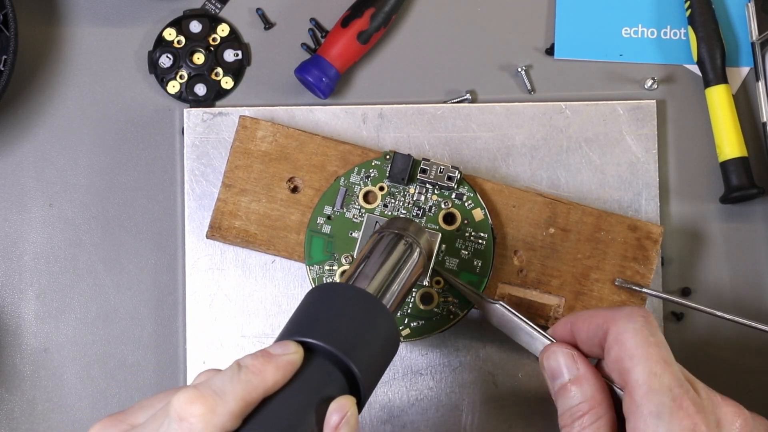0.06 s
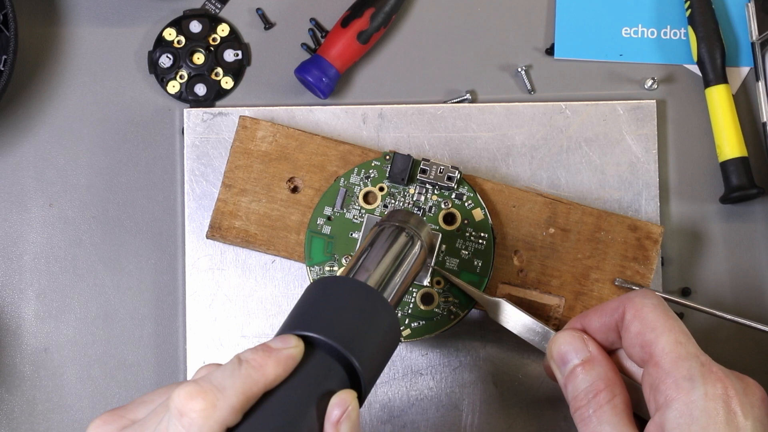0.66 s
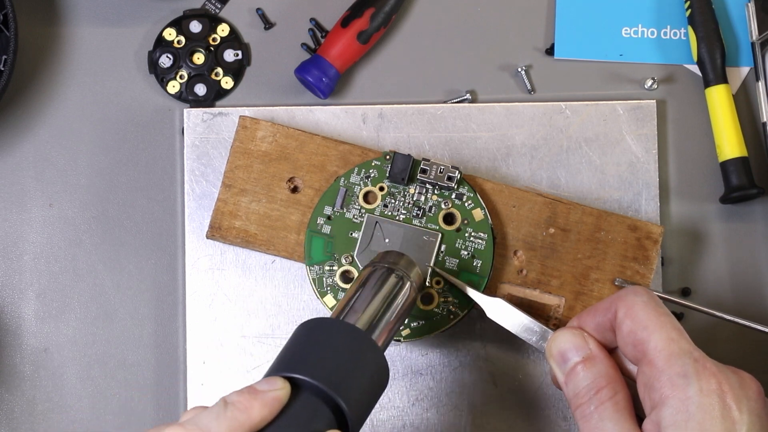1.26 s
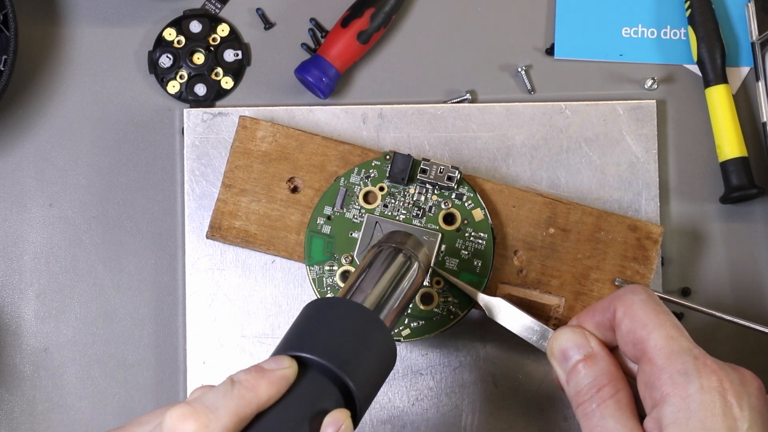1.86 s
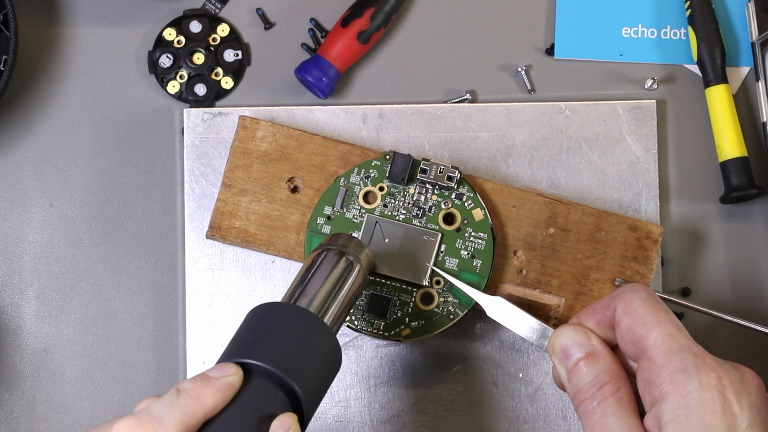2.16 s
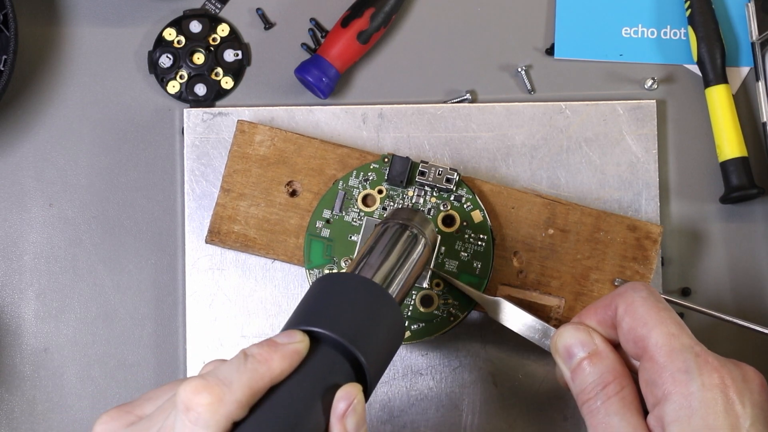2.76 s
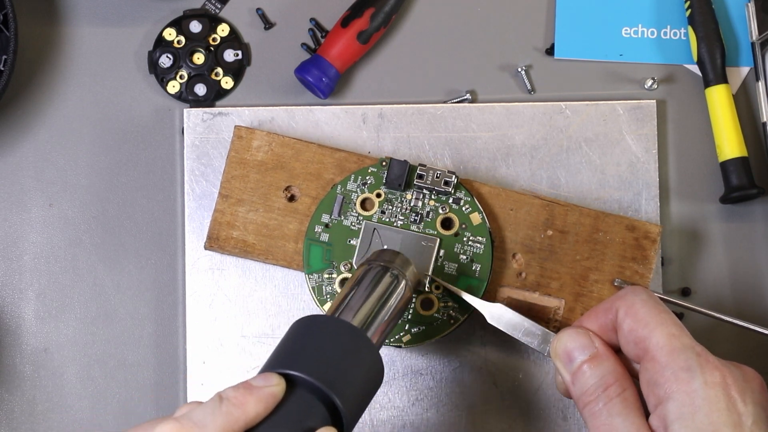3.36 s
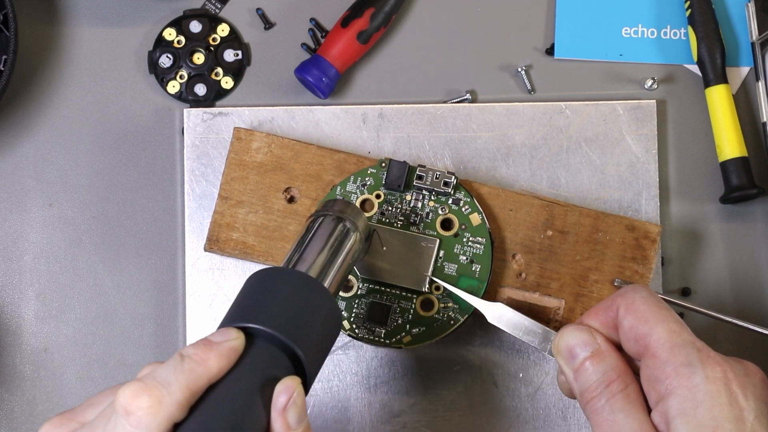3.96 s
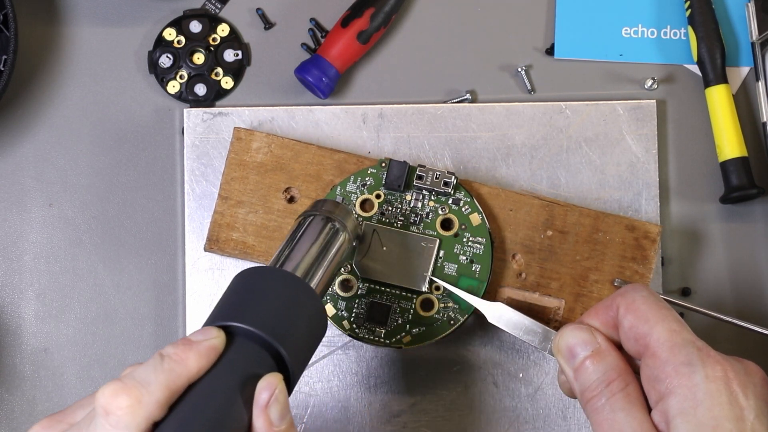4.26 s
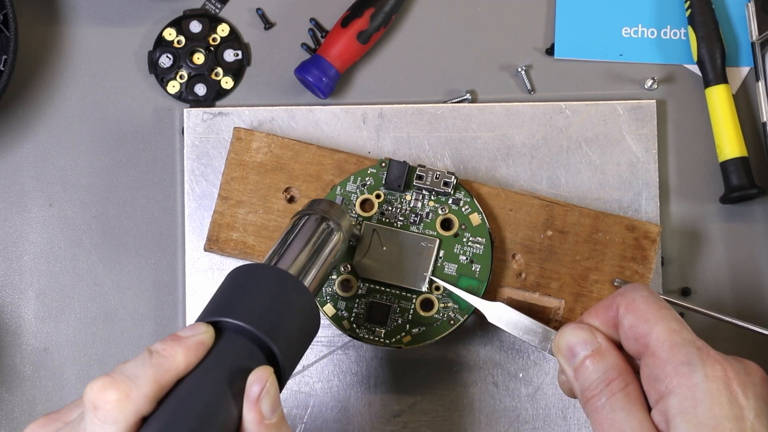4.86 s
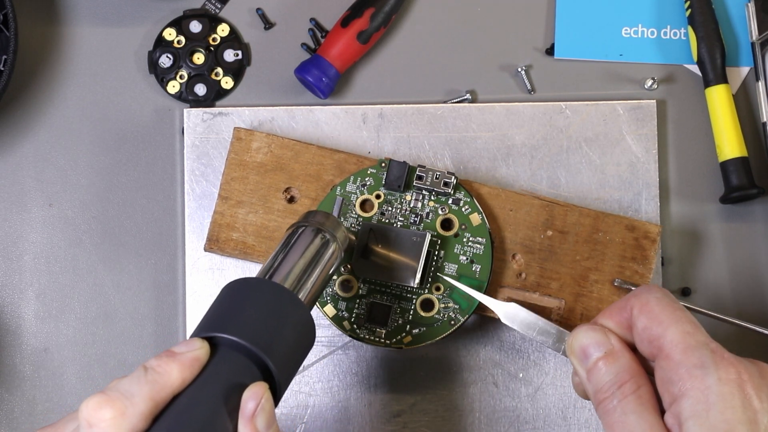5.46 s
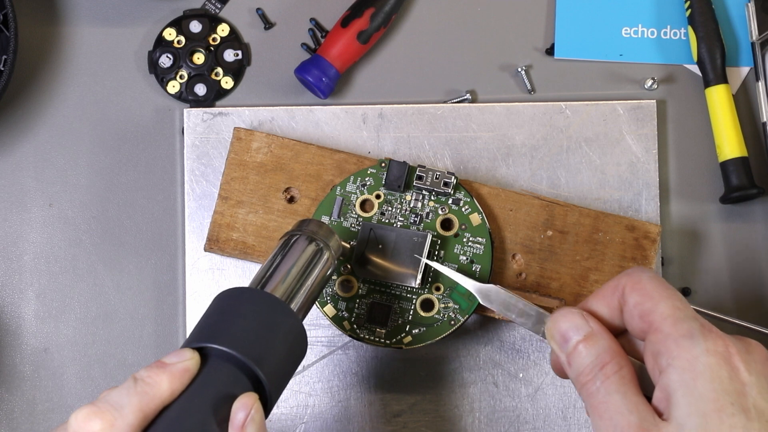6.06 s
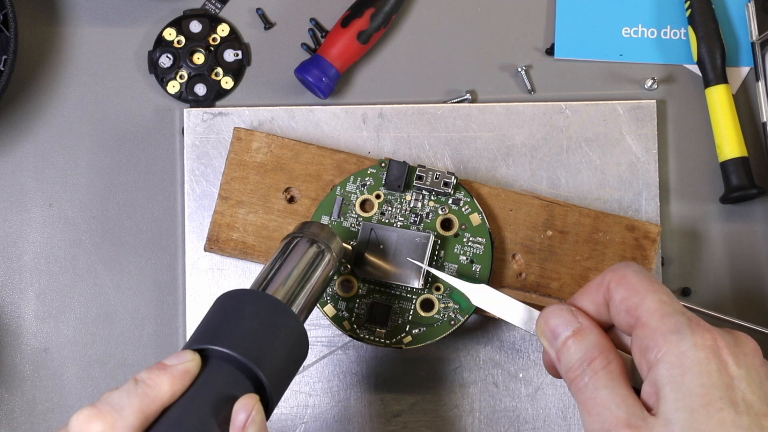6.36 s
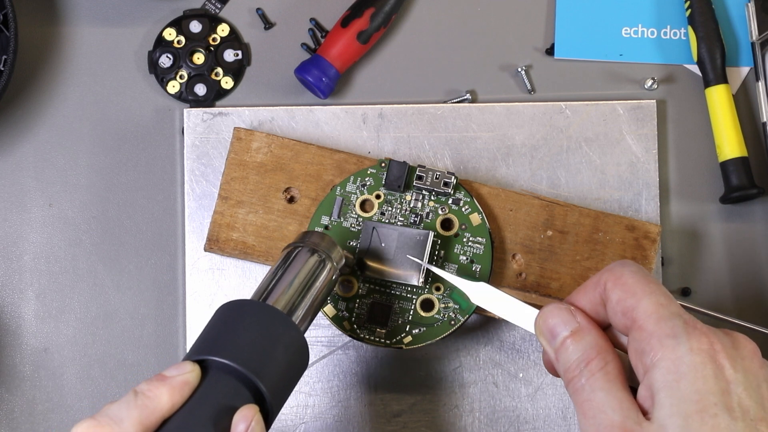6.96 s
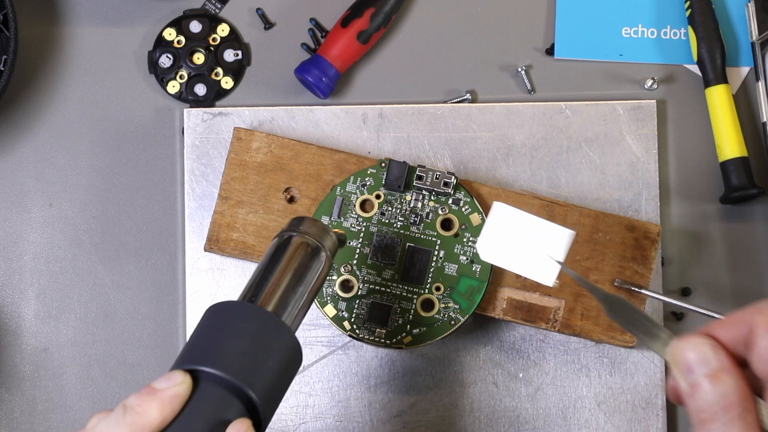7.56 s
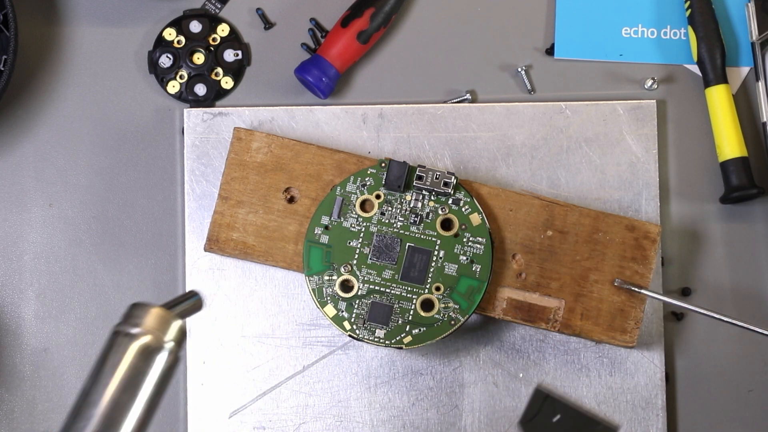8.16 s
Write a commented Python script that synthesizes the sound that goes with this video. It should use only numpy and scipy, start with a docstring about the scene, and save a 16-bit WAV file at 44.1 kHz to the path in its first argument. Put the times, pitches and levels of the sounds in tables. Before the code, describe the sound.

Close to the microphone in a dry workshop, a hot air gun hisses continuously over a circuit board, its blower rumbling underneath. Short roars come as the air crosses a metal shield's edge. Midway the level steps up and a faint hum shows, while the hiss occasionally thins for an instant. Hands softly nudge the bench, the air flutters more strongly, then the hiss sweeps and whistles thinly as the gun swings away.

```python
"""A hot air gun, close to one microphone, swept over a circuit board on a bench in a dry workshop. The nozzle
hisses over the blower's rumble, and the jet roars where it catches a metal shield's edge. The bench reflects
the sound, so the hiss turns hollow and sweeps as the gun lifts away at the end, with airy whistles from the
nozzle's lip. Hands bump the bench softly. The level steps up near 4 s, and now and then the hiss thins out for
an instant."""
import sys
import numpy as np
from scipy import signal
from scipy.fft import rfft, irfft, next_fast_len
from scipy.io import wavfile
from scipy.ndimage import uniform_filter1d, map_coordinates

SR = 44100
rng = np.random.default_rng(int(sys.argv[2]) if len(sys.argv) > 2 else 0)


def waveform_to_disk(signal):
    """Save audio, clipped to [-1, 1], as 16-bit WAV at the path in sys.argv[1]."""
    frames = np.transpose(np.atleast_2d(signal))
    scaled = np.clip(frames, -1, 1) * 32767
    samples = np.round(scaled).astype(np.int16)
    wavfile.write(sys.argv[1], SR, samples)


N = 362492

# the gun's distance from the bench: (time [s], height [multiple of working height])
GUN_HEIGHT = [(0, 0.98), (3.9, 1.025), (7.0, 0.99), (7.8, 0.95), (8.0, 1.35), (8.22, 1.2)]


def jet(sway_db=0.42, sway_per_s=6):
    """Large eddies wash over the board, small ones hiss at the nozzle; an unsteady hand sways the level."""
    # the nozzle tilts: (time [s], half length [s], hiss change [dB], wash and spray change [dB])
    tilts = [(5.25, 0.25, 1, 0), (5.896, .08, -2, 0), (6.553, 0.58, 1.4, 1.5), (7.2, 0.16, -6, -1),
             (7.53, .03, -1.5, -0.5)]
    free, step = in_open_air(), level_step()
    top_db = sum(db * swell(s, half, half) for s, half, db, _ in tilts) + sway_db * wobble(sway_per_s)
    body_db = sum(db * swell(s, half, half) for s, half, _, db in tilts) + sway_db * wobble(sway_per_s)
    wash = jet_band(lambda hz: above(hz, 1550) * below(hz, 5160), free, eddy_db=2.5)
    spray = jet_band(lambda hz: above(hz, 4800) * below(hz, 7430, order=16), free, eddy_db=3.5)
    hiss = jet_band(lambda hz: above(hz, 7400, order=16), free, eddy_db=4.3)
    wash *= amp(-45.5 + 3.5 * step - 3 * free + body_db)
    spray *= amp(-43.5 + 3.5 * step - 1.5 * free + body_db)
    hiss *= amp(-38 + 4 * step - 3.5 * free + top_db + 0.27 * wobble(25))
    return wash + spray + hiss


def jet_band(band, free, eddy_db):
    """One band of the jet: nearly steady on the board, swirling once it blows into open air."""
    # colour of the jet in open air: (frequency [Hz], relative level [dB])
    open_colour = [(1400, -17), (2000, -11.5), (2600, -12.5), (3200, -13.5), (5200, -15), (7000, -13.5),
                   (8000, -3), (9200, -1.5), (10200, -2.5), (11300, -9.5), (13500, -13), (15700, -17)]
    on_board = swirl(noise(lambda hz: through_gun(hz) * band(hz)), depth_db=1.16)
    in_air = swirl(noise(lambda hz: amp(along(open_colour, hz)) * band(hz)), depth_db=eddy_db)
    return np.sqrt(1 - free) * on_board + np.sqrt(free) * in_air


def through_gun(hz):
    """The air stream's colour, shaped by each resonance of the gun."""
    # broad colour of the air stream: (frequency [Hz], relative level [dB])
    air_colour = [(25.0, -33), (55.0, -17), (110.0, -15.5), (300.0, -11.5), (450.0, -15), (1100.0, -8.0),
                  (2000.0, -4.5), (3000.0, -2), (5000.0, -3), (7300.0, 0.0), (10500.0, 0.5), (14300.0, -6),
                  (15500.0, -9.5)]
    # resonances and antiresonances of housing, barrel and nozzle: (centre [Hz], width [Hz], gain [dB])
    resonances = [(146, 62, 16.0), (238, 36, 5.5), (333, 48, 3.9), (574, 106, 11.6), (704, 107, 5.6),
                  (921, 99, 4.7), (1392, 37, 3.9), (1500, 60, -3), (1596, 88, 6.6), (1955, 165, 4.9),
                  (2259, 109, 3.2), (2410, 213, 8.3), (2694, 113, 3.0), (2990, 170, -4), (3251, 206, 5.6),
                  (3466, 53, 3.7), (4020, 236, 5.7), (4362, 206, 7.2), (4830, 330, -2), (5012, 70, 4.8),
                  (5544, 236, 6.2), (5863, 158, 5.3), (6535, 350, 6.0), (6968, 152, 5.1), (7322, 43, 3.7),
                  (7642, 97, 4.2), (8163, 769, 9.5), (8925, 832, 11.2), (9954, 306, 3.7), (11360, 449, 2.4)]
    peaks_db = sum(db / (1 + (2 * (hz - centre) / width) ** 2) for centre, width, db in resonances)
    return amp(along(air_colour, hz) + peaks_db)


def swirl(x, depth_db):
    """Wandering eddies brighten and dull patches of the hiss, which glide down as the gun rises."""
    _, t, spectrum = signal.stft(x, SR, nperseg=1024)
    eddies = uniform_filter1d(rng.standard_normal(spectrum.shape), size=5, axis=0)
    eddies = uniform_filter1d(eddies, size=15, axis=1)
    glide = np.interp(t, *np.transpose(GUN_HEIGHT)) ** 0.21
    row, frame = np.indices(spectrum.shape)
    eddies = map_coordinates(eddies, [row * glide, frame], order=1, mode="mirror")
    swirled = signal.istft(spectrum * amp(depth_db * eddies / np.std(eddies)), nperseg=1024)[1][:N]
    return swirled / np.std(swirled)


def in_open_air(start_s=7.03, slide_s=0.65):
    """Share of the jet that has slid off the board, 0-1."""
    return np.clip((np.arange(N) / SR - start_s) / slide_s, 0, 1)


def level_step(at_s=3.968):
    """0 before the sound gets louder, 1 after."""
    return np.clip((np.arange(N) / SR - at_s) / .002, 0, 1)


def thinning(x, keep_hz=8500, width_hz=2700):
    """For an instant the broad rush drops away; the nozzle's peak and a few strong partials remain."""
    # instants when the hiss thins out: (time [s], length [s])
    dips = [(.868, .014), (4.11, .017), (4.238, .017), (4.41, .018), (4.688, .019), (4.751, .016),
            (4.965, .017), (5.05, .015), (5.306, .016), (5.498, .016), (5.605, .016), (5.765, .037),
            (5.862, .017), (6.137, .016), (6.202, .016), (6.991, .015), (7.46, .02), (7.61, .017),
            (7.737, .017)]
    t = np.arange(N) / SR
    gap = np.clip(sum(below(abs(t - s), length / 2, order=3) for s, length in dips), 0, 1)
    hz, _, spectrum = signal.stft(x, SR, nperseg=1024)
    power = abs(spectrum) ** 2
    strong = power > 3.3 * uniform_filter1d(power, size=40, axis=0)
    partials = np.maximum(1.4 * strong, amp(-16))
    nozzle_peak = below(abs(hz - keep_hz), width_hz / 2, order=4)[:, None]
    thin = signal.istft(spectrum * np.maximum(partials, nozzle_peak), SR, nperseg=1024)[1][:N]
    return x * (1 - gap) + thin * gap


def edge_roar(colour_share=0.28):
    """The jet splits on the shield's edge: it flutters in the barrel, and rasps when it passes close."""
    # the jet meets an edge, longest while the shield is prised up:
    # (time [s], rise [s], fall [s], flutter level [dB], rasp level [dB])
    crossings = [(1.175, 0.034, 0.027, -43.5, -48), (1.295, 0.042, 0.03, -44, -40.5),
                 (1.455, 0.043, 0.032, -47.5, -48), (1.985, .05, .035, -46.5, -37.5),
                 (2.23, 0.059, 0.095, -40.5, -46), (3.46, .14, .07, -54, -46.5),
                 (4.4, 0.37, 0.46, -50, -60), (6.48, 0.13, 0.18, -38.5, -60), (6.75, 0.18, 0.23, -36, -42)]
    # colours of the flutter and the rasp: (frequency [Hz], relative level [dB])
    flutter_colour = [(700, -42), (1400, -20), (1750, -11), (1970, -4), (2120, -6), (2380, 0), (2720, -3.5),
                      (3050, -13), (4200, -17), (6000, -30), (9000, -42)]
    rasp_colour = [(1200, -35), (2000, -4), (2450, -0.5), (3000, 2), (3700, -2), (4300, 3), (5100, -1),
                   (6500, -10), (10000, -35)]
    flutter_gain = sum(amp(db) * swell(s, rise, fall) for s, rise, fall, db, _ in crossings)
    rasp_gain = sum(amp(db) * swell(s, rise, fall) for s, rise, fall, _, db in crossings)
    voiced = lambda colour: noise(lambda hz: amp(along(colour, hz)) * through_gun(hz) ** colour_share)
    flutter = voiced(flutter_colour) * flutter_gain * amp(.4 * wobble(35))
    return flutter + voiced(rasp_colour) * rasp_gain


def lip_whistle(half_width_hz=230, skirt_hz=1200):
    """Vortices leave the lip almost regularly: gliding puffs of narrow hiss in a swirling skirt."""
    # puffs as the gun swings away: (time [s], half length [s], pitch [Hz], level [dB])
    puffs = [(7.427, .06, 8620, -36.5), (7.602, 0.044, 8600, -37), (7.752, 0.073, 8800, -36),
             (7.86, .04, 9550, -39), (7.997, 0.052, 8850, -42), (8.149, .08, 9050, -42)]
    pitch_hz = curves(puffs)[1]
    strength = sum(amp(db) * swell(s, half, half) for s, half, _, db in puffs)
    carrier = np.sqrt(2) * np.sin(2 * np.pi * np.cumsum(pitch_hz) / SR)
    core = carrier * noise(lambda hz: below(hz, half_width_hz, order=2))
    skirt = swirl(carrier * noise(lambda hz: below(hz, skirt_hz, order=4)), depth_db=5)
    return (amp(-3) * core + amp(-1) * skirt) * strength


def blower():
    """Fan noise booms in housing and barrel; the rotor's hum stands out in the louder part."""
    step = level_step()
    rumble = noise(lambda hz: through_gun(hz) * below(hz, 480))
    rumble *= amp(-60 + 4 * step + 0.69 * wobble(4.5))
    barrel = noise(lambda hz: through_gun(hz) * above(hz, 392) * below(hz, 1500))
    barrel *= amp(-55 + 5.46 * step - 5.5 * in_open_air() ** 2 + 0.93 * wobble(7))
    rotor_hz = 236.9 + .3 * wobble(3)
    hum = np.sin(2 * np.pi * np.cumsum(rotor_hz) / SR) * amp(-66.5 + 6.5 * step)
    return rumble + barrel + hum


def bumps(half_s=0.07):
    """The hands nudge board and bench: dull, brief swells."""
    # soft handling bumps: (time [s], pitch [Hz], level [dB])
    nudges = [(.57, 115, -58.5), (5.96, 72, -66), (6.09, 283, -60), (6.18, 198, -55.5)]
    thud = lambda pitch: noise(lambda hz: above(hz, pitch * 0.97) * below(hz, pitch))
    return sum(amp(db) * swell(s, half_s, half_s, squareness=2) * thud(pitch) for s, pitch, db in nudges)


def bench(x):
    """Reflections comb the sound; they reach the microphone later as the gun rises."""
    # reflections off board and bench: (delay at working height [s], gain [linear])
    reflections = [(.0005, .16), (.001174, .07), (.0015, .075), (.0029, .06), (.00585, .06)]
    height, = curves(GUN_HEIGHT)
    return x + sum(gain * map_coordinates(x, [np.arange(N) - delay * height * SR])
                   for delay, gain in reflections)


def room(x, wet_db=-13, t60=.1):
    """The workshop's short, dry answer, thin in the bass."""
    t = np.arange(SR // 4) / SR
    tail = rng.standard_normal(len(t)) * amp(-60 * t / t60) * (t > .004)
    wet = signal.fftconvolve(x, tail / np.linalg.norm(tail))[:N]
    return x + amp(wet_db) * filtered(wet, lambda hz: above(hz, 890, order=2))


def amp(db):
    """Decibels to gain."""
    return 10 ** (np.asarray(db) / 20)


def along(points, hz):
    """(frequency [Hz], value) points read on a log axis."""
    f, v = np.transpose(points)
    return np.interp(np.log(hz + 1), np.log(f + 1), v)


def curves(rows):
    """One value per sample for each column after the time."""
    s, *cols = np.transpose(rows)
    return [np.interp(np.arange(N) / SR, s, c) for c in cols]


def swell(at, rise, fall, squareness=2.3):
    """A bell-shaped gain that peaks at 1, with its own rise and fall times [s]."""
    t = np.arange(N) / SR - at
    return np.exp(-abs(t / np.where(t < 0, rise, fall)) ** squareness)


def wobble(rate):
    """A smooth random curve, rate knots a second."""
    return map_coordinates(rng.standard_normal(int(N * rate / SR) + 4), [np.arange(N) * rate / SR])


def filtered(x, response):
    """x shaped by a frequency response."""
    m = next_fast_len(N + 8192)
    return irfft(rfft(x, m) * response(np.fft.rfftfreq(m, 1 / SR)), m)[..., :N]


def noise(response):
    """Turbulence of rms 1 with the given colour."""
    x = filtered(rng.standard_normal(N), response)
    return x / np.std(x)


def above(hz, edge_hz, order=8):
    """Gain of a high-pass."""
    return np.sqrt(1 - below(hz, edge_hz, order=order) ** 2)


def below(hz, edge_hz, order=8):
    """Gain of a low-pass."""
    return 1 / np.sqrt(1 + (hz / edge_hz) ** (2 * order))


def scene():
    """The gun over the bench at one close microphone, the same in both channels."""
    gun = bench(blower() + jet() + edge_roar()) + lip_whistle()
    sound = thinning(room(gun + bumps())) * amp(-0.15)
    return np.array([sound, sound])


def record(dry, top_hz=15780):
    """The microphone chain passes nothing above its band limit."""
    return filtered(dry, lambda hz: hz < top_hz)


dry = scene()
out = record(dry)
waveform_to_disk(out)
```